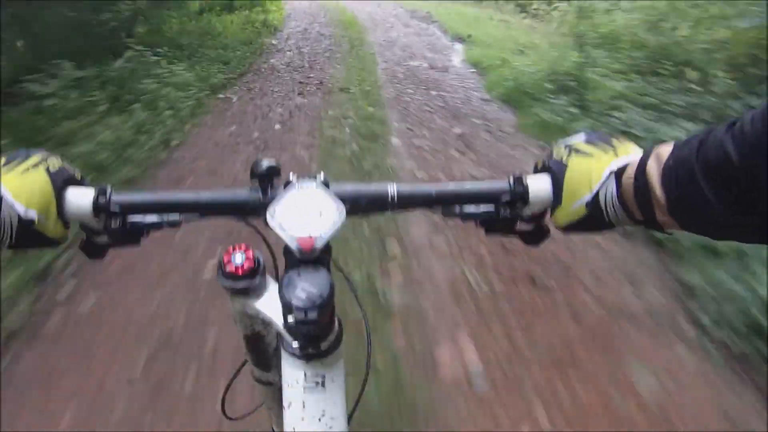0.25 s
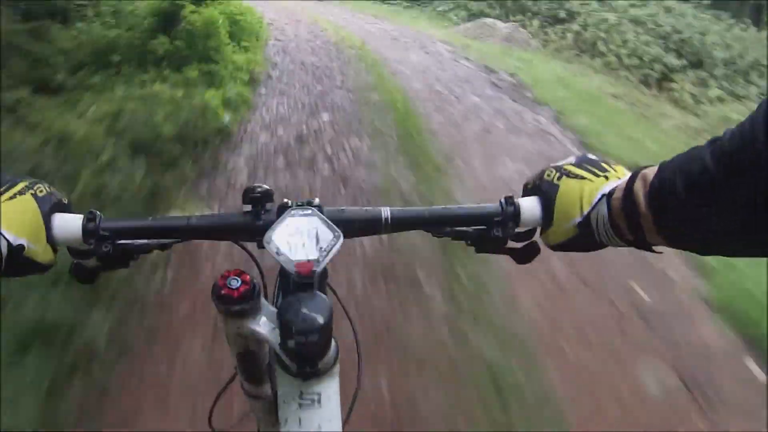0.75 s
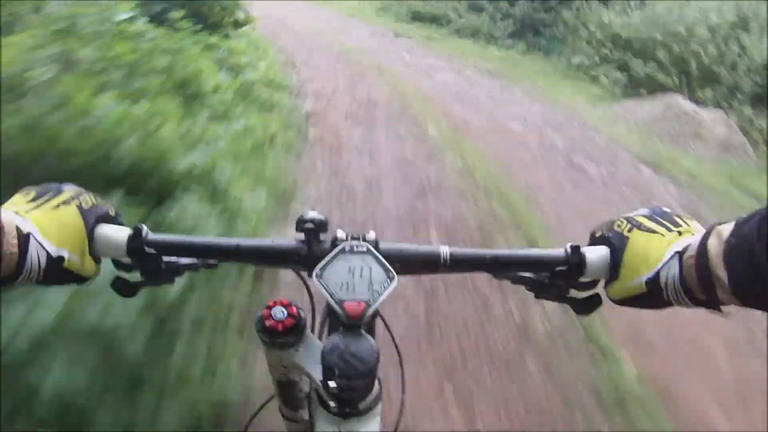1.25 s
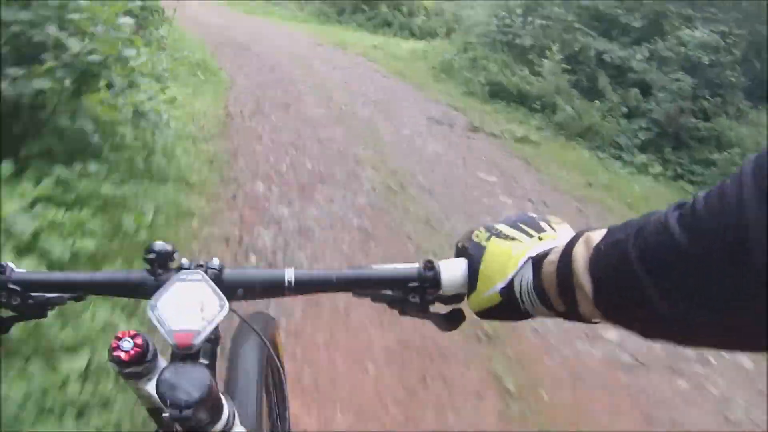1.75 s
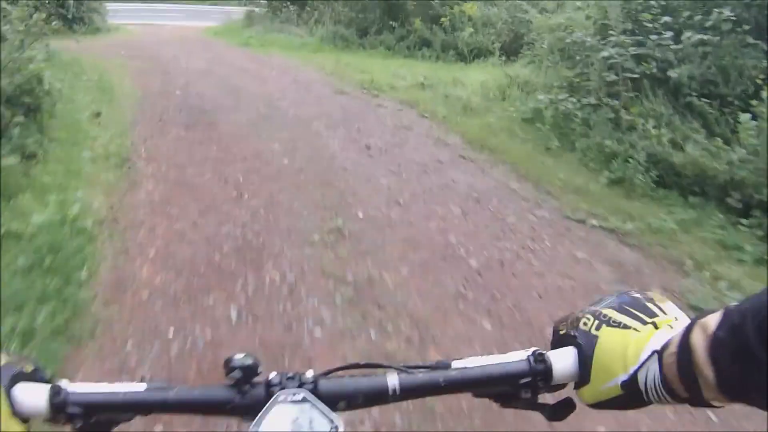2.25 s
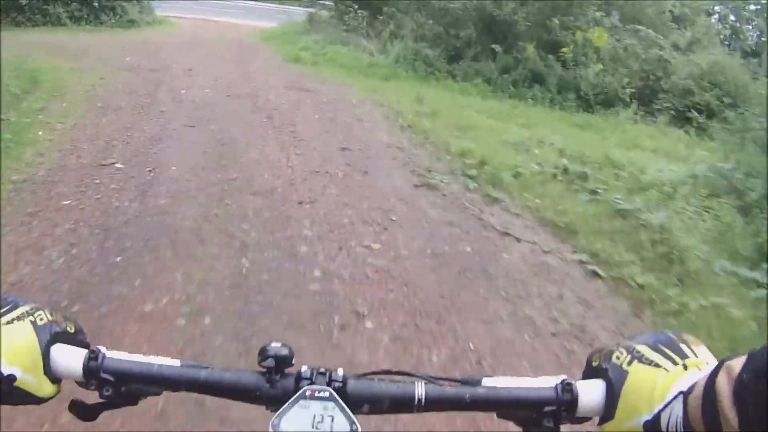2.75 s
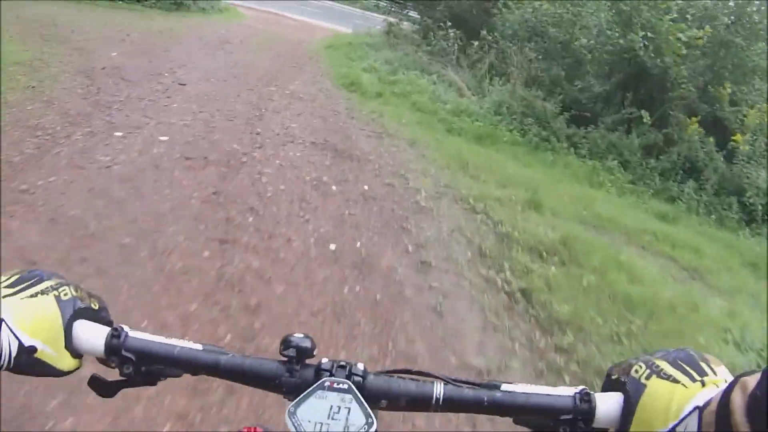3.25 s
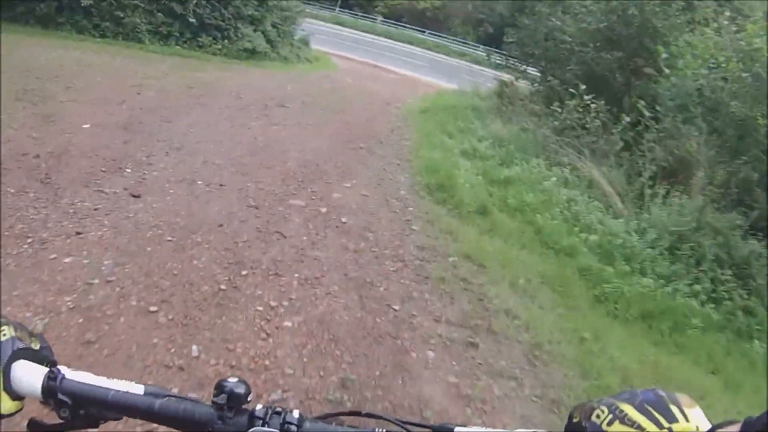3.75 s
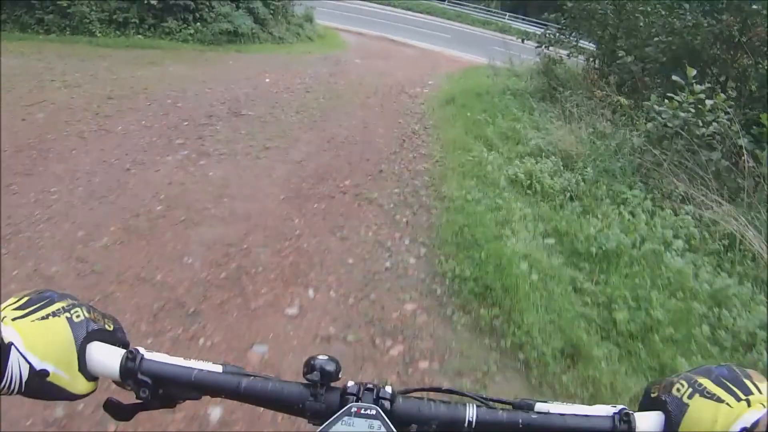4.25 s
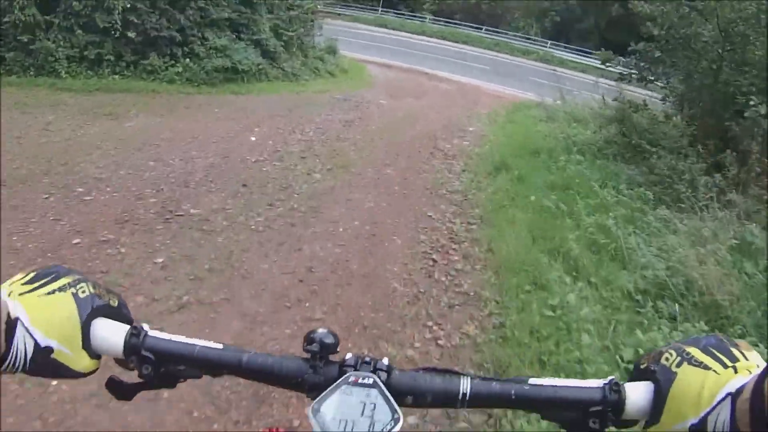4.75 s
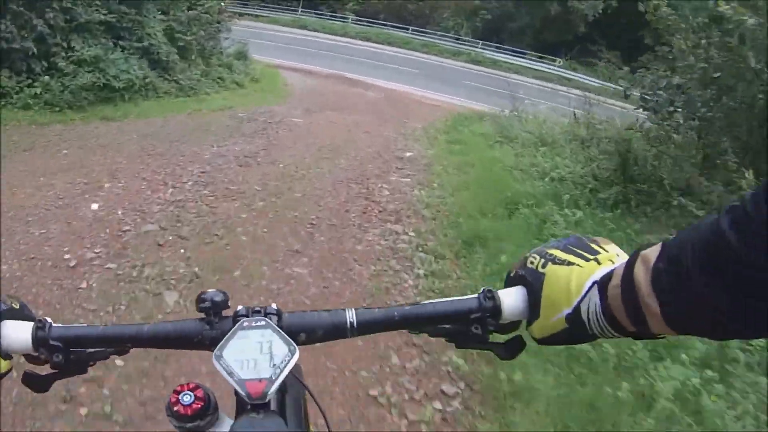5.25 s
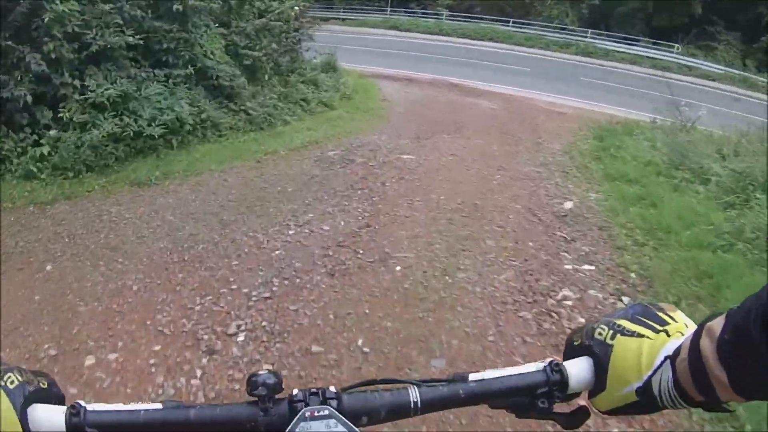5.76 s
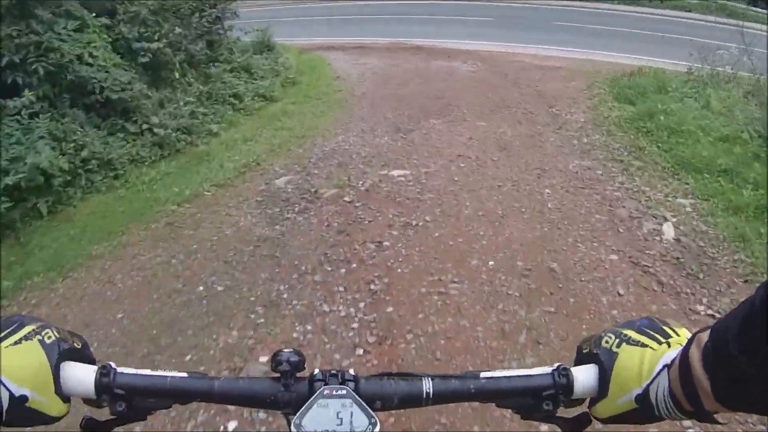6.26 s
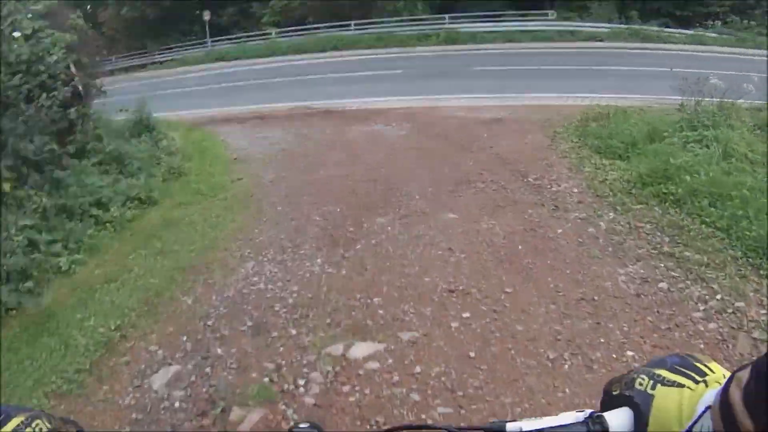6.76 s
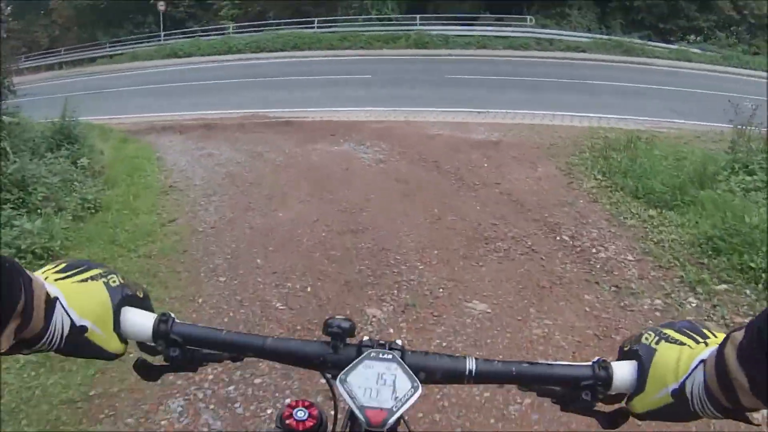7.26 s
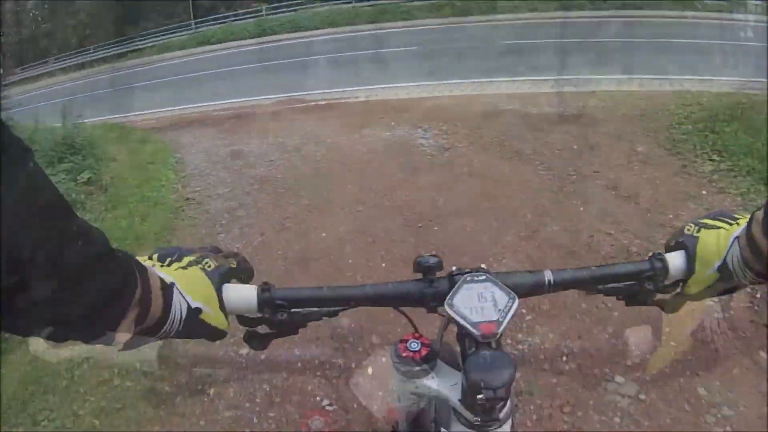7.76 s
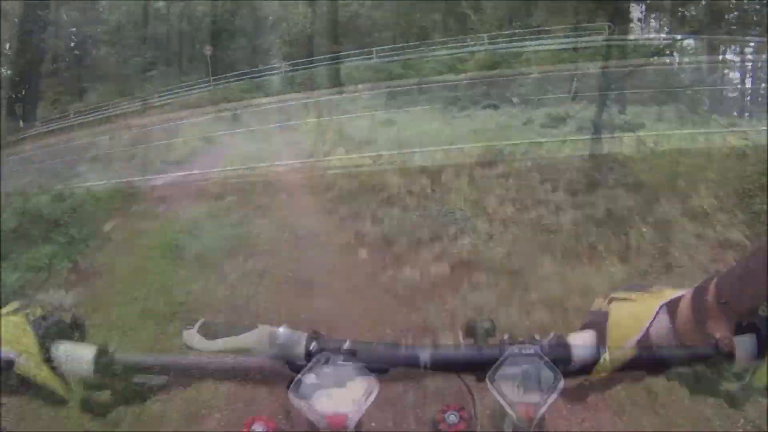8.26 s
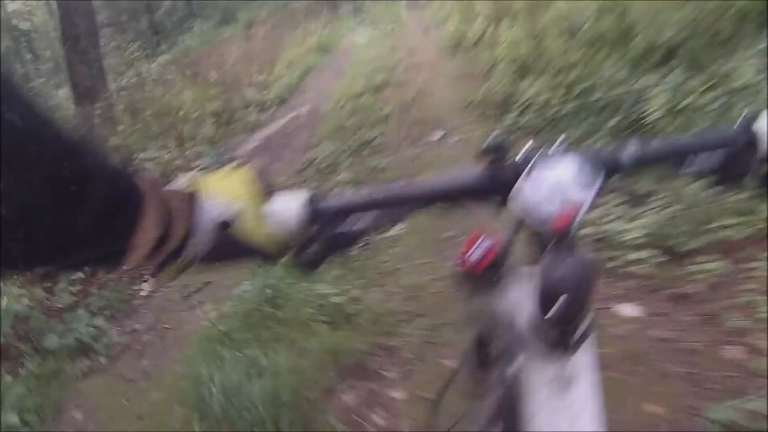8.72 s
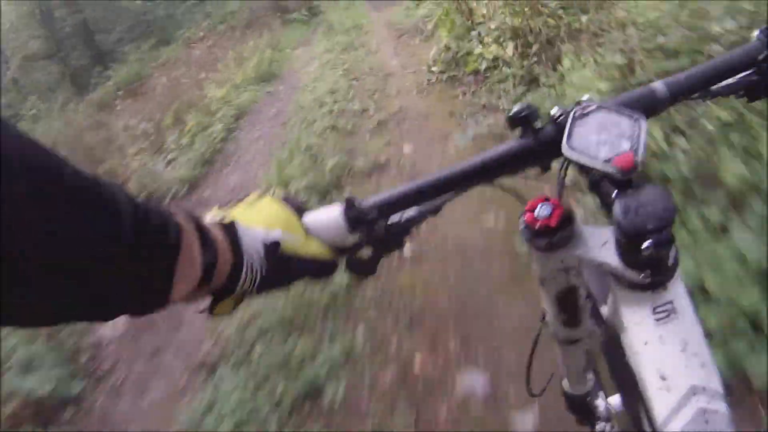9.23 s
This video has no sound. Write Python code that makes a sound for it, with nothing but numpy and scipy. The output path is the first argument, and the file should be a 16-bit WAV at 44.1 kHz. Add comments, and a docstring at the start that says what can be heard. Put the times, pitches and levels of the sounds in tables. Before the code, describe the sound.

A mountain bike coasts down a dirt track, heard close and boxy from a cased microphone on the rider's chest, with low wind buffeting. The tyres hiss, skid briefly, then crunch over gravel and knock against stones. In a quieter stretch the freewheel ticks faintly. The crunching returns, the brake grates, and near the end come a sharp click, a heavy thump and clothing rubbing on the microphone.

```python
"""Mountain bike tyres coast down a dirt track: they hiss on packed earth, crunch gravel, skid, hit stones.
The microphone is close, in a camera in a plastic case on the rider's chest; the case's resonances colour
hiss, grit and stones, and wind buffets it. Below, the brake disc chirps thinly, the freewheel ticks from
about halfway, and the pads later grate. Near the end the case takes a thump and rubs against clothing."""
import sys
import numpy as np
from scipy import signal
from scipy.fft import rfft, irfft, next_fast_len
from scipy.io import wavfile
from scipy.ndimage import uniform_filter1d, map_coordinates

SR = 44100
rng = np.random.default_rng(int(sys.argv[2]) if len(sys.argv) > 2 else 0)


def master(y):
    """Save y as 16-bit WAV."""
    cut = np.clip(np.atleast_2d(y).T, -1, 1)
    pcm = np.round(cut * 32767)  # scale
    wavfile.write(sys.argv[1], SR, pcm.astype(np.int16))


N = 418509
TIME = np.arange(N) / SR
SIZE = next_fast_len(N + SR // 2, True)
FREQ = np.fft.rfftfreq(SIZE, 1 / SR)


def amp(db):
    """Decibels to gain."""
    return 10 ** (np.asarray(db) / 20)


def unit(x):
    """Scale to rms 1."""
    return x / np.sqrt(np.mean(x ** 2) + 1e-20)


def spectrum(points):
    """(Hz, dB) points joined on a log frequency axis."""
    hz, db = np.transpose(points)
    return np.interp(np.log(FREQ + 1), np.log(hz), db)


def curves(rows):
    """One value per sample for each column after the time."""
    times, *columns = np.transpose(rows)
    return [np.interp(TIME, times, column) for column in columns]


def wobble(rate):
    """A smooth random curve of rms 1, with rate knots a second."""
    knots = rng.standard_normal(int(N * rate / SR) + 4)
    return unit(map_coordinates(knots, [TIME * rate / SR]))


def causal(db):
    """Minimum-phase response with this gain: it rings after a blow, never before."""
    cepstrum = irfft(np.log(amp(db) + 1e-6), SIZE)
    cepstrum[1:SIZE // 2] *= 2
    cepstrum[SIZE // 2 + 1:] = 0
    return np.exp(rfft(cepstrum))


def filtered(x, response):
    """x through a frequency response."""
    return irfft(rfft(x, SIZE) * response, SIZE)[:N]


def noise(db):
    """Noise of rms 1 with this spectrum."""
    return unit(filtered(rng.standard_normal(N), amp(db)))


def levelled(x, window_s):
    """x divided by its running rms."""
    window = np.hanning(int(window_s * SR)) * 2 / (window_s * SR)
    power = np.abs(signal.fftconvolve(x ** 2, window, "same"))
    return x / np.sqrt(power + 1e-12)


def add(track, s, sound):
    """Mix a sound into the track at time s."""
    start = max(0, round(s * SR))
    track[start:start + len(sound)] += sound[:max(0, N - start)]


def crumble(per_s, spread_db, t60):
    """Envelope of rms 1: sudden collapses at random times, each dying away."""
    starts = (rng.random(N) < per_s / SR) * amp(spread_db * np.minimum(rng.standard_normal(N), 1.8))
    power = signal.lfilter([1], [1, -amp(-120 / (t60 * SR))], starts ** 2)
    return unit(np.sqrt(power + 1e-9))


def contact(start, length, attack_s, release_s, db_per_s):
    """Envelope of one contact: a quick rise, a sloping hold, a fading end."""
    age = np.maximum(TIME - start, 0)
    hold = amp(db_per_s * np.minimum(age, length))
    return np.minimum(age / attack_s, 1) * hold * np.exp(-np.maximum(age - length, 0) / release_s)


# Steady hiss behind everything: (frequency [Hz], relative level [dB])
FLOOR_SPECTRUM = [(100, 16), (5000, 2.5), (9000, -6), (13000, -8.5), (15000, -16)]
def noise_floor():
    """A faint, even hiss."""
    return amp(-62.5) * noise(spectrum(FLOOR_SPECTRUM))


# Two dry clicks: (time [s], peak [dB])
POPS = [(7.448, -14.5), (8.848, -22.5)]
def pops(fall_s=.0065):
    """A sudden step that leaks away sounds as a dry click with a low body."""
    t, out = np.arange(SR // 20) / SR, np.zeros(N)
    for s, db in POPS:
        add(out, s, amp(db) * np.exp(-t / fall_s))
    return out


# Plastic wall around the microphone: (frequency [Hz], gain [dB])
CASE_WALL = [(40, -31), (130, -30), (250.0, -28.5), (600.0, -25.5), (1000.0, -30), (1500.0, -22.5),
             (2600.0, -30), (3300.0, -26.5), (4200.0, -35), (6500.0, -40.5), (8500.0, -45.5),
             (11000.0, -45), (15000.0, -57)]
# Its resonances: (frequency [Hz], width [Hz], lift [dB])
CASE_MODES = [(293.3, 52, 13.5), (438, 73, 9), (605, 45, 5.5), (767.4, 133, 13.5), (1285, 322, 22),
              (1412, 120, 3), (1650, 49, 6), (1848, 55, 8.5), (2115, 338, 17), (2370, 199, 11.5),
              (2905, 205, 13), (3722, 330, 9), (4715, 610, 10), (5305, 590, 13.5), (5890, 52, 8),
              (7160, 1900, 14.5), (9660, 350, 8)]
def case_colour():
    """Gain in dB of the plastic case: a dull wall with ringing peaks."""
    peaks = sum(db / (1 + (2 * (FREQ - hz) / width) ** 2) for hz, width, db in CASE_MODES)
    return spectrum(CASE_WALL) + peaks


# Air on the case: (time [s], relative gust level [dB], relative buffet level [dB])
WIND_LEVELS = [(0, -36.5, -37), (.4, -36, -37), (1.4, -37, -40.5), (2.2, -35, -43.5), (3.3, -38, -50),
               (4.2, -37.5, -48), (5.1, -39.5, -51), (5.6, -44.5, -53), (6.1, -39.5, -47.5),
               (6.8, -36.5, -47.5), (7.25, -34, -55.5), (7.5, -26.5, -47), (7.95, -33.5, -48.5),
               (8.22, -40, -48), (8.33, -22.5, -42.5), (8.8, -28, -42), (8.98, -39, -46.5),
               (9.49, -33, -48)]
# Single gusts: (peak time [s], lift [dB])
GUST_PEAKS = [(.45, 6), (1.12, 6.5), (1.51, 9.5), (2.35, 9), (2.69, 9.5), (3.75, 4.5), (4.8, 3), (5.23, 7),
              (5.72, 7), (6.73, 7.5), (7.47, 3.5), (7.67, 6), (8.14, 11), (9.28, 8)]
# Slow gusts and quicker buffeting, each: (frequency [Hz], relative level [dB])
GUST_SPECTRUM = [(5, -31), (13, 8.5), (24, 2), (35, -6.5), (55, -15), (100, -61), (200, -90)]
BUFFET_SPECTRUM = [(25, -36), (55, 4.5), (100, 3.5), (160, -2.5), (250, -13.5), (400, -16.5), (700, -25.5),
                   (1500, -25), (4000, -69)]
def wind(gust_width_s=.05, flutter_hz=200):
    """Right at the microphone, big eddies push slowly on the case; small ones buffet and flutter."""
    gust_db, buffet_db = curves(WIND_LEVELS)
    lift_db = sum(db * np.exp(-((TIME - s) / gust_width_s) ** 2) for s, db in GUST_PEAKS)
    gust = noise(spectrum(GUST_SPECTRUM))
    buffet = noise(spectrum(BUFFET_SPECTRUM)) * amp(2.4 * wobble(35))
    flutter = noise(-20 * np.log2((FREQ + 1) / flutter_hz) ** 2) * unit(amp(3 * wobble(50)))
    strongest_db = buffet_db.max()
    flutter_db = strongest_db - 9.5 + 1.95 * (buffet_db - strongest_db)  # drops fast as the wind eases
    return (amp(gust_db + lift_db + 3.5) * levelled(gust, .35)
            + amp(buffet_db + .23 * lift_db - .5 + 1.34 * wobble(9)) * levelled(buffet, .26)
            + amp(flutter_db) * flutter)


# Cloth against the case: (peak time [s], level [dB], rise [s], fall [s])
RUBS = [(8.282, -25.5, .011, 0.013), (8.418, -31.5, 0.034, 0.019), (8.49, -45, .018, 0.0063),
        (8.652, -39.5, 0.059, 0.044), (8.725, -43, 0.023, .025), (8.833, -30, 0.02, 0.0074)]
# Its swish: (frequency [Hz], relative level [dB])
CLOTH_SPECTRUM = [(290, -33), (500, -12), (665, -16.5), (1330, 2), (1720, 4.5), (2290, -0.5), (3090, -9),
                  (3560, -1), (3880, -9.5), (6570, -14), (7160, -23.5), (11000, -33), (15000, -42)]
def clothing(fizz_db=-57, fizz_hz=8460):
    """Clothing drags across the case in short swells; the fibres fizz at the height of each stroke."""
    swell, fizz_swell = np.zeros((2, N))
    for s, db, rise, fall in RUBS:
        stroke = np.exp(-np.maximum((s - TIME) / rise, (TIME - s) / fall))
        swell += amp(db) * stroke
        fizz_swell += stroke ** 2
    swish = swell * noise(spectrum(CLOTH_SPECTRUM))
    fizz = fizz_swell * noise(-30 * np.log2((FREQ + 1) / fizz_hz) ** 2)
    return (swish + amp(fizz_db) * fizz) * amp(1.95 * wobble(150))


# Jolts at the chest mount:
# (time [s], thud gain [dB], thud pitch [Hz], thud decay [s], knock gain [dB], rasp gain [dB])
JOLTS = [(1.898, -10.5, 24.1, 0.044, -58, -65), (7.45, -22, 50, 0.0051, -44, -35),
         (8.268, 1, 93, 0.019, -6.5, -23.5)]
# A knock on the case: (frequency [Hz], relative level [dB])
KNOCK_SPECTRUM = [(60, -19), (200, -7), (500, 4), (900, 0.5), (1400, 11.5), (2200, -8), (4000, -30),
                  (8000, -47), (15000, -56)]
def jolts(case):
    """The case bounces on its mount: a low thud with an overtone, a hard knock, a rasp of the strap."""
    t, out = np.arange(SR // 6) / SR, np.zeros(N)
    blow = irfft(causal(spectrum(KNOCK_SPECTRUM)), SIZE)[:len(t)]
    ring = irfft(case, SIZE)[:len(t)]
    knock = blow / np.abs(blow).max() + .5 * ring / np.abs(ring).max()
    strap = noise(spectrum(CLOTH_SPECTRUM)) + .73 * noise(spectrum(KNOCK_SPECTRUM))
    rasp = strap[:len(t)] * amp(-60 * t / .095)
    for s, thud_db, hz, decay, knock_db, rasp_db in JOLTS:
        thud = np.sin(2 * np.pi * hz * t) * np.exp(-(t / decay) ** 4)
        overtone = amp(-14) * np.sin(2 * np.pi * 1.81 * hz * t) * np.exp(-t / decay)
        add(out, s, amp(thud_db) * (thud + overtone) + amp(knock_db) * knock + amp(rasp_db) * rasp)
    return out


# A pawl's snap, back at the rear hub: (frequency [Hz], relative level [dB])
PAWL_SPECTRUM = [(300, -32), (1000, -11), (1350, -5), (1700, -8), (2300, 0), (2850, -6.5), (3300, -10.5),
                 (4300, -21), (5300, -13.5), (7000, -23), (14000, -50)]
def freewheel(start_s=4.4, teeth_per_s=42, ring_hz=2436, attack_s=.0026, t60=.031):
    """The pawls drop into each ratchet tooth: a soft snap and a brief ring, each a little different."""
    teeth = np.cumsum(teeth_per_s * np.exp(.06 * wobble(40))) / SR
    age = (teeth % 1) / teeth_per_s
    size, detune = rng.standard_normal((500, 2))[teeth.astype(int)].T
    envelope = amp(3.5 * size) * (1 - np.exp(-age / attack_s)) * amp(-60 * age / t60)
    snaps = unit(filtered(envelope * rng.standard_normal(N), causal(spectrum(PAWL_SPECTRUM))))
    ring = unit(envelope * np.sin(2 * np.pi * ring_hz * np.exp(.08 * detune) * age))
    return (TIME > start_s) * amp(-62.5) * (snaps + amp(-3.5) * ring)


# The disc brushing its pad, down at the wheel: (time [s], level [dB], chirps [count], length of each [s])
DISC_CHIRPS = [(.014, -60, 3, .014), (.385, -62, 3, .017), (.626, -59, 3, 0.016), (1.526, -58, 1, .018),
               (3.228, -53, 1, .02), (3.293, -53, 1, .017), (3.349, -53, 1, .024), (4.132, -53, 1, 0.015),
               (6.756, -50, 1, .034), (6.869, -53, 1, .032), (7.103, -55, 1, .028)]
def brake_chirps(disc_hz=12120, glide_per_s=.15, spacing_s=.034):
    """The disc sings briefly in one very high mode, rising a little as it fades."""
    t, out = np.arange(SR // 8) / SR, np.zeros(N)
    for s, db, count, length in DISC_CHIRPS:
        progress = 3 * t / length
        swell = amp(db) * progress * np.exp(1 - progress)
        for k in range(round(count)):
            roughness = 1 + .44 * unit(uniform_filter1d(rng.standard_normal(len(t)), SR // 250))
            hz = disc_hz * (1 + .004 * rng.standard_normal() + glide_per_s * t)
            add(out, s + k * spacing_s, swell * roughness * np.sin(2 * np.pi * np.cumsum(hz) / SR))
    return out


# Squeezes of the brake: (time [s], length [s], level [dB])
SQUEEZES = [(7.085, 0.065, -38), (7.161, 0.18, -38.5), (7.344, 0.22, -41.5), (7.562, 0.11, -37),
            (7.711, 0.026, -34.5), (7.777, 0.17, -50)]
# The grating pad: (frequency [Hz], relative level [dB])
PAD_SPECTRUM = [(300, -24), (800, -27.5), (1600, -8.5), (1950, -13), (2080, 6), (2280, -4), (2550, -20),
                (2900, -20.5), (4200, -28.5), (9000, -39.5), (15000, -81)]
def brake_drag():
    """At each squeeze the pad sticks and slips on the disc, grating in one band."""
    pressure = sum(amp(db) * contact(s, length, attack_s=.014, release_s=.013, db_per_s=3)
                   for s, length, db in SQUEEZES)
    slips = rng.standard_normal(N) * (.52 + crumble(per_s=110, spread_db=-1, t60=.021))
    grate = filtered(slips, causal(spectrum(PAD_SPECTRUM)))
    return pressure * levelled(grate, .062)


# Packed earth passing below the rider: (time [s], level [dB])
EARTH_LEVELS = [(0, -45.5), (.7, -43), (1.3, -42.5), (1.9, -47.5), (3.1, -42.5), (4.5, -49), (4.8, -59.5),
                (6.05, -56.5), (6.3, -44), (7.6, -47), (7.9, -51), (8.15, -44), (8.5, -51.5), (8.8, -53),
                (9.49, -61.5)]
# Its hiss, before the case colours it: (frequency [Hz], relative level [dB])
EARTH_SPECTRUM = [(100, 27.5), (280, 4), (770, 1), (1300, -1), (1950, 5), (3000, -1), (3750, 3),
                  (5200, -5.5), (9000, 1), (15000, -6)]
def tyre_hiss(case_db):
    """Knobs on packed earth make a fine, uneven hiss."""
    hiss_db, = curves(EARTH_LEVELS)
    patter = unit(2.2 + crumble(per_s=100, spread_db=7, t60=.039))
    return amp(hiss_db) * patter * noise(case_db + spectrum(EARTH_SPECTRUM))


# A tyre locking on the track: (time [s], length [s], level [dB])
SKIDS = [(1.412, 0.091, -31.5), (1.522, 0.11, -26), (1.65, 0.13, -27)]
# Its scrape: (frequency [Hz], relative level [dB])
SKID_SPECTRUM = [(120, -5), (225, -17), (290, 2), (380, -26), (700, -17), (1000, -10.5), (1420, 10),
                 (1750, -15), (2100, 2.5), (2600, -10), (3600, -14.5), (4500, -24), (14000, -48)]
def skid():
    """Locked knobs slide over the dirt with a broad scrape."""
    sliding = sum(amp(db) * contact(s, length, attack_s=.013, release_s=.01, db_per_s=-17)
                  for s, length, db in SKIDS)
    return sliding * noise(spectrum(SKID_SPECTRUM))


# Loose gravel under the tyres: (time [s], length [s], relative level [dB], treble trim [dB])
GRAVEL_PATCHES = [(1.333, .05, -33.5, -6), (1.418, 0.066, -26.5, -8), (1.519, 0.13, -26, -5),
                  (1.651, 0.11, -25.5, -8), (1.765, 0.076, -42.5, 1), (2.043, 0.075, -40, -1.5),
                  (2.1, 0.12, -29.5, -2.5), (2.249, 0.077, -31, -3), (2.341, 0.071, -33.5, -2),
                  (2.433, 0.13, -30.5, -6), (2.621, 0.022, -31.5, -2), (2.702, 0.23, -31.5, -4),
                  (2.946, 0.069, -34, -5), (3.161, 0.078, -32, -5), (3.234, 0.082, -30.5, -4),
                  (3.347, 0.15, -29.5, -5), (3.532, 0.11, -31, -5.5), (3.658, 0.25, -37, -3.5),
                  (3.997, 0.03, -38.5, -5.5), (4.06, 0.021, -39.5, -3), (4.092, 0.32, -38, -4),
                  (4.361, .065, -34, -7), (4.455, 0.021, -38, -4), (4.562, 0.15, -50.5, -2.5),
                  (6.138, 0.096, -36.5, -3.5), (6.249, .2, -36, 0.5), (6.475, 0.15, -39, .5),
                  (6.667, 0.16, -38.5, 1), (6.852, 0.21, -40, .5), (7.083, 0.22, -39.5, 2),
                  (7.324, .2, -46, 6.5), (7.559, 0.21, -45.5, 2.5)]
def gravel(case, grains_per_s=3500, fine_above_hz=3000, treble_above_hz=1810):
    """Grit grinds under the tread in clumps and rings the case; coarse and fine grains flicker apart."""
    hits = rng.random(N) < grains_per_s / SR
    grains = hits * rng.choice([-1, 1], N) * amp(3.5 * np.minimum(rng.standard_normal(N), 2))
    heaps = 1.1 * wobble(30) + wobble(65)  # shared by both grain sizes
    coarse_share = 1 / (1 + (FREQ / fine_above_hz) ** 6)
    grit, out = np.zeros((2, N))
    for clump_db, share in (5, coarse_share), (4, 1 - coarse_share):
        clumps = np.clip(unit(heaps + .9 * wobble(150)), -2.5, 1.6)
        grit += filtered(grains * amp(clump_db * clumps), case * share)
    lows = filtered(grit, 1 / (1 + (FREQ / treble_above_hz) ** 10))
    body, treble = levelled(lows, .39), levelled(grit - lows, .2)
    for s, length, db, treble_db in GRAVEL_PATCHES:
        tread = contact(s, length, attack_s=.014, release_s=.017, db_per_s=-8)  # sags as the grit clears
        out += tread * amp(db - 4.5) * (body + amp(treble_db - 3) * treble)
    return out


def ground_db(times):
    """The louder of the listed levels at these times: packed earth or a gravel patch."""
    db = np.interp(times, *np.transpose(EARTH_LEVELS))
    for s, length, patch_db, _ in GRAVEL_PATCHES:
        db = np.where((times > s) & (times < s + length), np.maximum(db, patch_db), db)
    return db


# Big stones struck by the tyres, a metre or so below the microphone: (time [s], peak [dB])
BIG_STONES = [(1.4095, -14), (1.454, -12), (1.5139, -11), (1.6521, -10), (1.7533, -31), (1.808, -21.5),
              (2.0492, -27), (2.2679, -16.5), (2.3511, -22.5), (2.5057, -15), (2.5361, -18.5),
              (2.7666, -25), (2.6299, -22.5), (2.7067, -22.5), (2.9547, -22), (2.971, -20), (3.3441, -19),
              (3.5138, -21.5), (3.5468, -17.5), (3.7996, -23.5), (4.0632, -17.5), (4.4277, -21),
              (4.4548, -21), (4.5935, -31), (4.6808, -37), (5.3632, -40), (6.1275, -23.5), (6.141, -22),
              (6.2173, -17), (6.4123, -20), (6.4852, -23), (6.6748, -23.5), (6.9301, -25.5), (6.995, -22.5),
              (7.0793, -22.5), (7.5627, -25), (8.0212, -31.5), (8.675, -24.5), (9.006, -41),
              (9.1676, -37.5), (9.4295, -41.5)]
# A stone's blow, before the case colours it: (frequency [Hz], relative level [dB])
STONE_SPECTRUM = [(280, 0), (700, -4), (1300, 2.5), (2300, 2.5), (4000, -6.5), (8000, -7), (15000, -6)]
def stones(case, pebbles_per_s=18, grind_s=.01, t60=.054):
    """A stone grinds for an instant, then snaps free in a scatter of grit; pebbles fly at random."""
    t, out = np.arange(SR // 12) / SR, np.zeros(N)
    ring = irfft(case * causal(spectrum(STONE_SPECTRUM)), SIZE)[:len(t)]
    swell = amp(-60 * np.maximum((grind_s - t) / .017, (t - grind_s) / t60))
    times = np.cumsum(rng.exponential(1 / pebbles_per_s, 300))
    peaks_db = ground_db(times) + rng.uniform(4, 10, len(times))
    pebbles = [(s, db) for s, db in zip(times, peaks_db) if s < TIME[-1]]
    for s, db in list(BIG_STONES) + pebbles:
        force = .77 * rng.standard_normal(len(t)) * swell
        force[round(grind_s * SR)] += 1  # the snap
        knock = signal.fftconvolve(force, ring)[:len(t)]
        add(out, s - grind_s, amp(db) * knock / np.abs(knock).max())
    return out


def scene():
    """At the rider's chest: tyres, bike parts, wind, case jolts, cloth rubs, two dry clicks, faint hiss."""
    case_db = case_colour()
    case = causal(case_db)
    ground = gravel(case) + tyre_hiss(case_db) + skid() + stones(case)
    bike = freewheel() + brake_chirps() + brake_drag()
    jolts_and_rubs = jolts(case) + clothing()
    return (noise_floor() + pops() + wind() + jolts_and_rubs + bike + ground)[None]


def record(dry):
    """The camera clips at full scale and keeps nothing above 15.4 kHz."""
    return filtered(np.clip(dry[0], -1, 1), FREQ < 15400)[None]


dry = scene()
out = record(dry)
master(out)
```